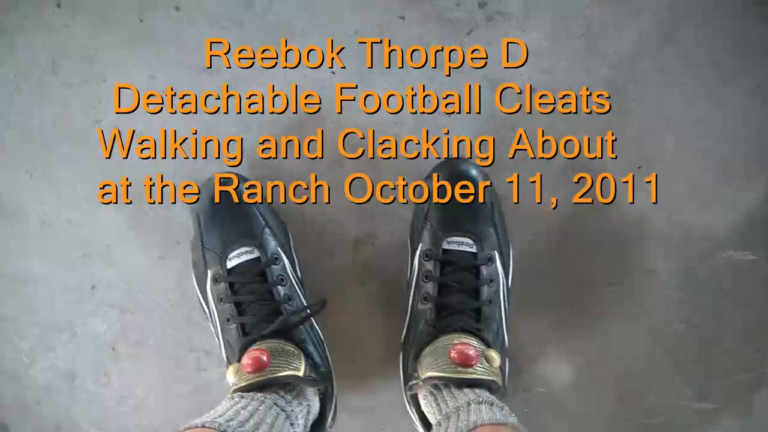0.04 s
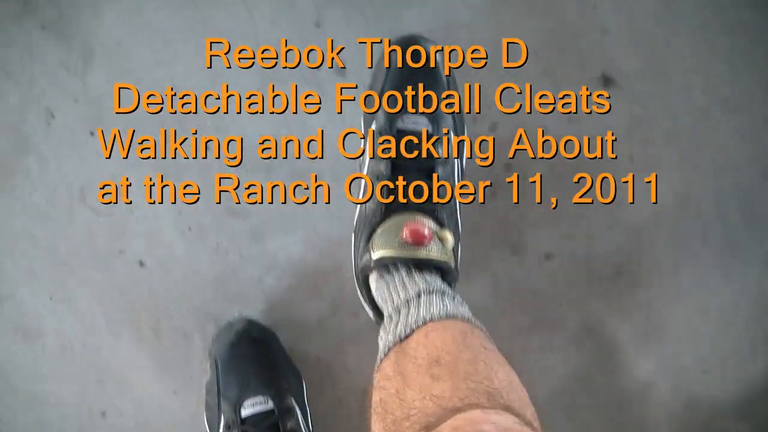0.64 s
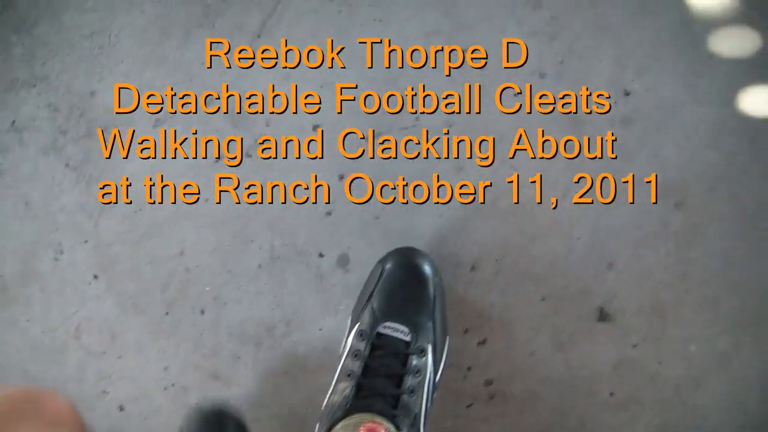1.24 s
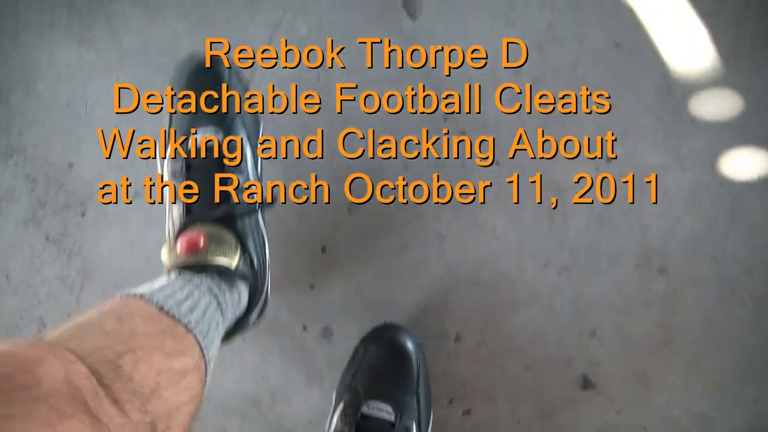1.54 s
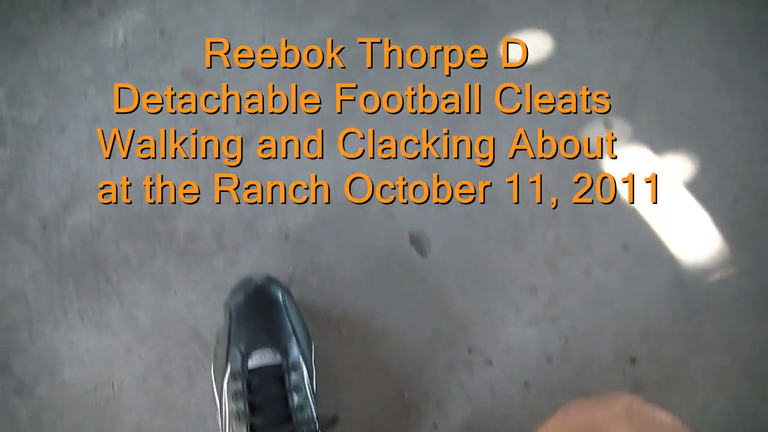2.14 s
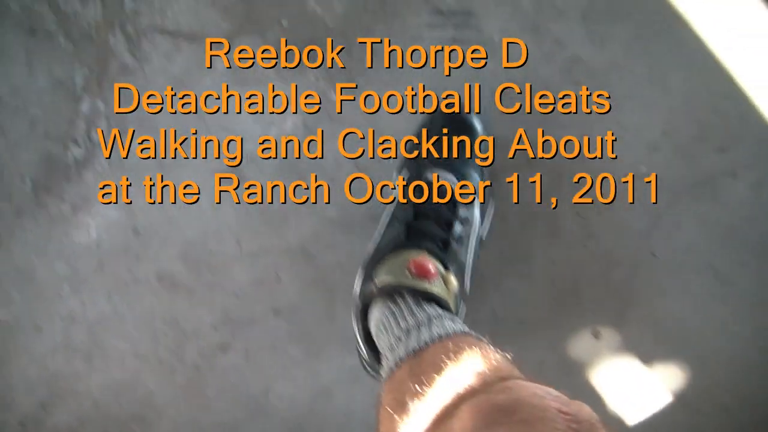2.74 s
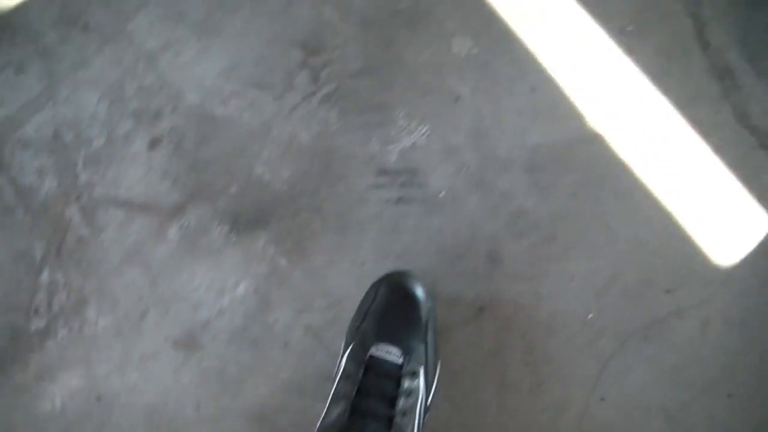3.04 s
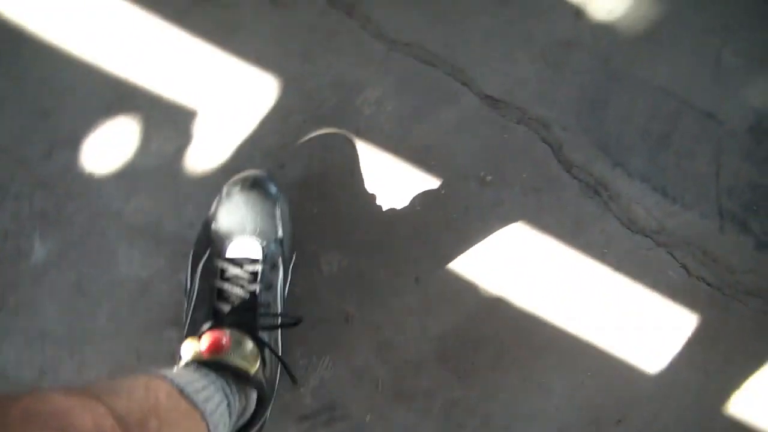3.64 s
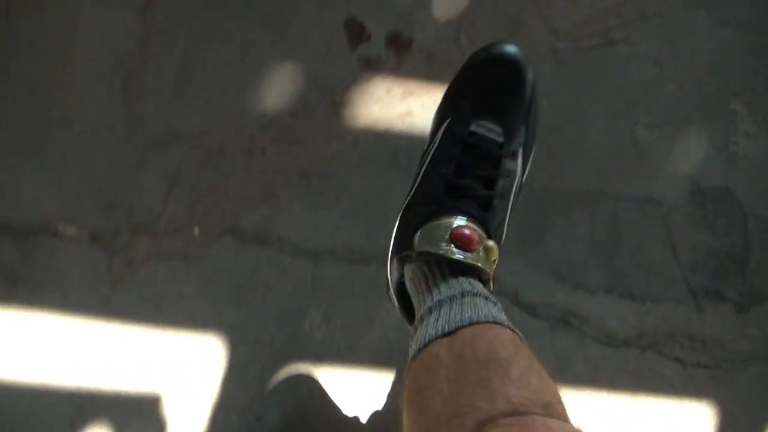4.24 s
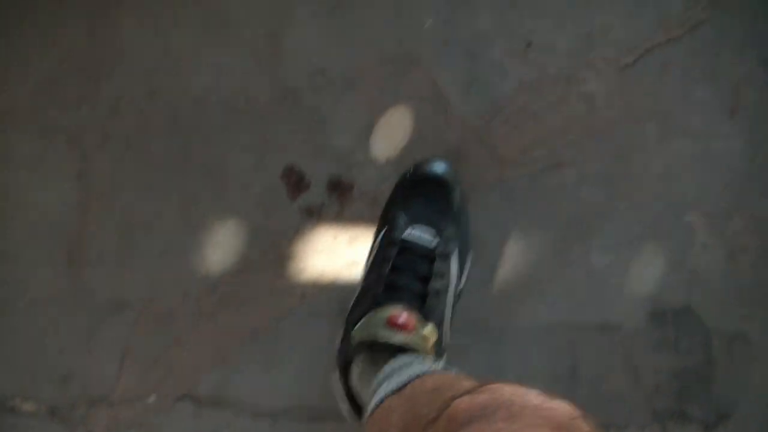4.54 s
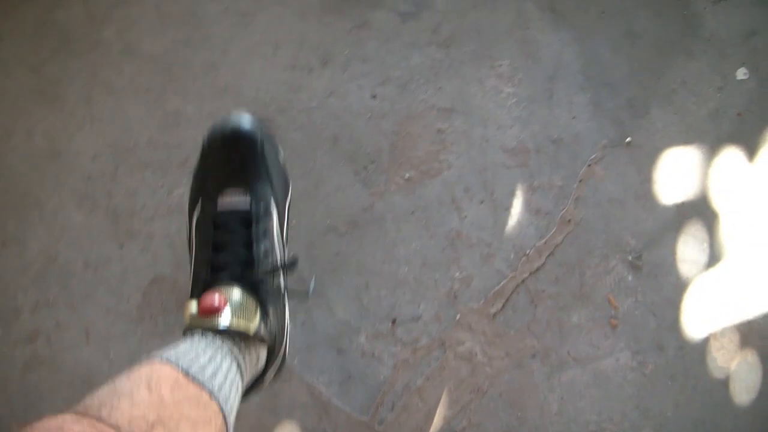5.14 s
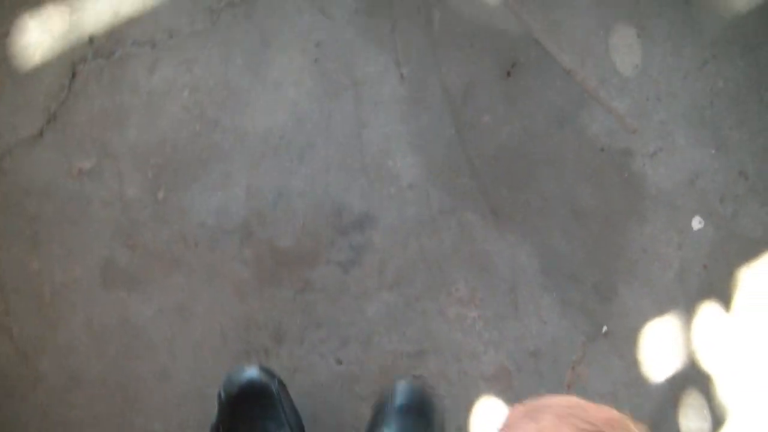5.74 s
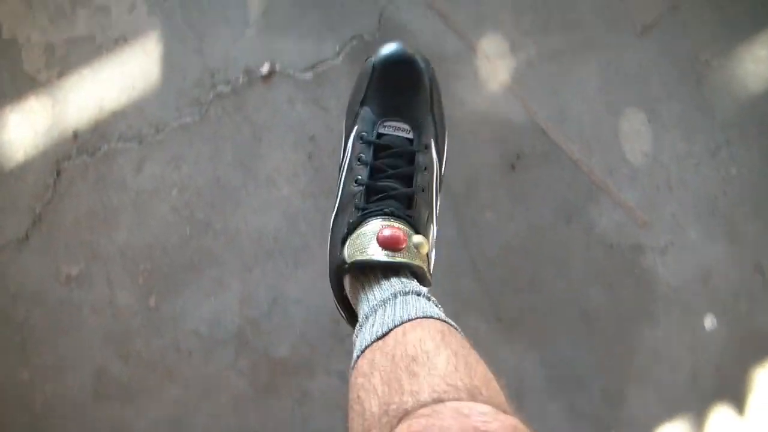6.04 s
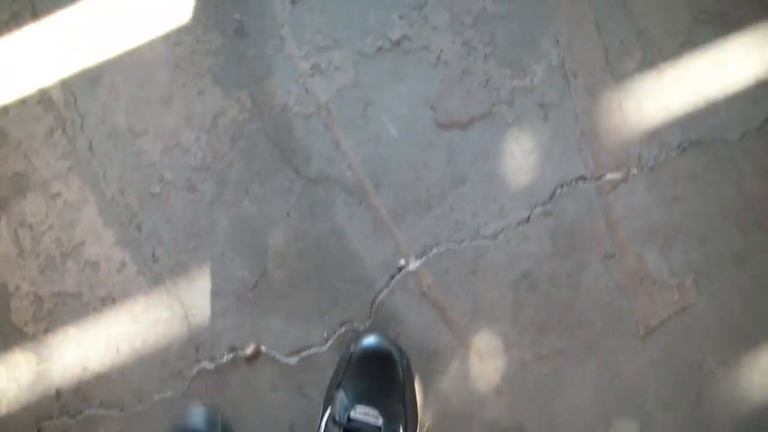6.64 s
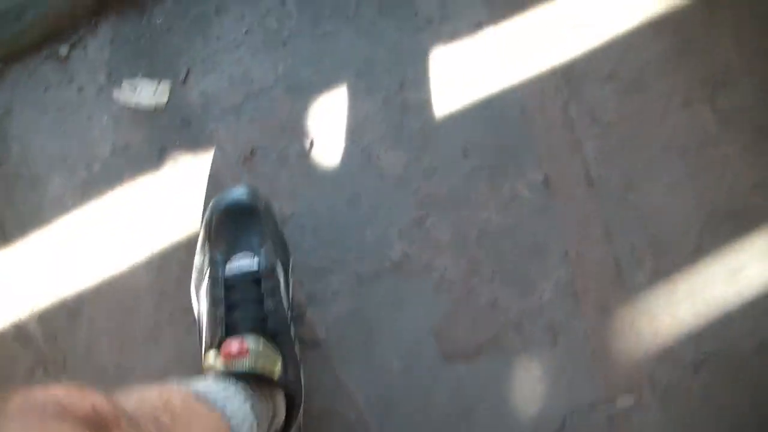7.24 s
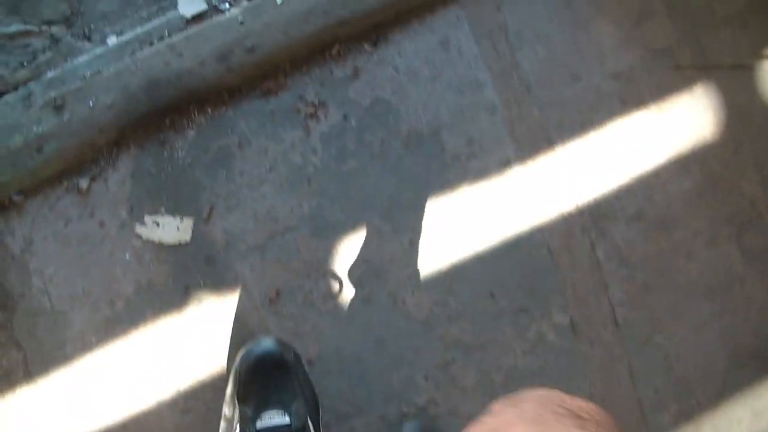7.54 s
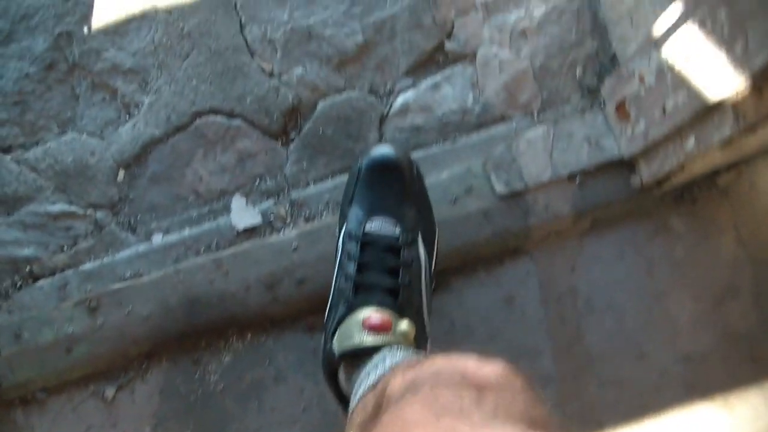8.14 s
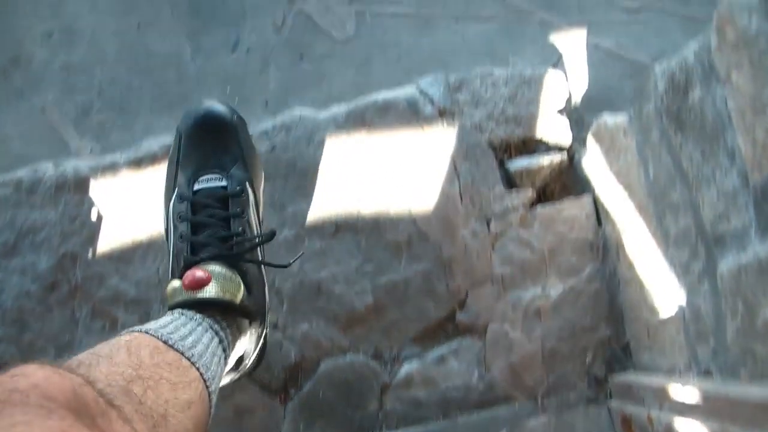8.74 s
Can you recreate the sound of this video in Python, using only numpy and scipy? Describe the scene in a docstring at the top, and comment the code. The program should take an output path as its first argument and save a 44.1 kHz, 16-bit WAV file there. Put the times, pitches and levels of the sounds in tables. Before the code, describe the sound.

Someone in football cleats walks steadily across a concrete floor, just below the microphone. Each step is a heel knock followed by a quick run of hard clacks from sole and studs, ringing briefly in a bare hall. Between steps the shoes creak faintly and a little grit crunches. Moving air bumps the microphone, more toward the end, over a quiet hiss.

```python
'''Football cleats in a bare hall

Someone walks over a concrete floor, just below the microphone. Each step is a heel knock and a quick
run of clacks from sole, plate and studs; they ring on in the hall, and the hardest ones overload.
Between steps the shoes creak as they bend, grit crunches and a swinging leg brushes by once.
Moving air bumps the microphone over a quiet hiss.'''
import sys
import numpy as np
from scipy import signal
from scipy.fft import rfft, irfft
from scipy.io import wavfile

SR = 44100
rng = np.random.default_rng(int(sys.argv[2]) if len(sys.argv) > 2 else 0)


def dump_mix(stems):
    """Bounce the given channels to the path in sys.argv[1] as a 16-bit WAV at rate SR."""
    frames = np.atleast_2d(stems).T  # one column per channel
    limited = np.clip(frames, -1, 1)  # hard clip at full scale
    pcm = np.round(limited * 32767).astype(np.int16)
    wavfile.write(sys.argv[1], SR, pcm)


N = 392049
TIME = np.arange(N) / SR

# The walk. Each row: heel landing in seconds, heel level in dB, seconds until the second heel stud,
# echo level in dB, echo brightness in dB.
STEPS = [(0.75, -1.5, .022, -4, 5.5), (1.7492, -6.5, 0.025, 0.5, -2), (2.6603, -2, 0.046, 0, -3.5),
         (3.6072, 2, 0.017, 0.5, 3.5), (4.4293, 1, 0.043, -4, 2.5), (5.3602, -4.5, .013, 0, 3),
         (6.2035, 3, .0334, -4, 1.5), (7.1614, 5.5, .012, -2.5, 0.5), (8.0709, 2.5, .023, -5.5, 5.5)]


def from_db(db):
    """Decibels to gain."""
    return 10 ** (np.asarray(db) / 20)


def rms_one(x):
    """Scale to unit rms."""
    return x / np.sqrt(np.mean(x ** 2) + 1e-20)


def at_hz(points, hz):
    """Read a curve on a log-frequency axis."""
    freqs, values = np.transpose(points)
    return np.interp(np.log(np.maximum(hz, 1)), np.log(freqs), values)


def fader(points, t):
    """Gain that follows a curve of (seconds, dB) points."""
    return from_db(np.interp(t, *np.transpose(points)))


def add(out, start_s, sound):
    """Mix a sound in at its start time."""
    first = max(round(start_s * SR), 0)
    part = out[..., first:first + sound.shape[-1]]
    part += sound[..., :part.shape[-1]]


def coloured(x, curve):
    """Equalise with a curve of (Hz, dB) points."""
    size = x.shape[-1]
    return irfft(rfft(x) * from_db(at_hz(curve, np.fft.rfftfreq(size, 1 / SR))), size)


def softened(x, corner_hz):
    """A contact lasts a moment, so it drives little above its corner frequency."""
    return signal.sosfilt(signal.butter(4, corner_hz, fs=SR, output="sos"), x)


def ring(modes, pitch=1, size=900):
    """Heavily damped modes that swell for one time constant and die within a few cycles."""
    t = TIME[:size]
    return sum(from_db(db) * t / tau * np.exp(1 - t / tau) * np.sin(2 * np.pi * hz * pitch * t)
               for hz, tau, db in modes)


def diffuse(size):
    """White noise from all around: alike at both microphone ports in the bass, wide in the treble."""
    # Stereo likeness. Each row: frequency in Hz, left-right correlation.
    likeness = [(60, 0.71), (290, 0.95), (640, 0.87), (1410, 0.32), (3100, 0.056), (7000, 0.11)]
    alike = at_hz(likeness, np.fft.rfftfreq(size, 1 / SR))
    mid, side = rfft(rng.standard_normal((2, size)))
    return irfft(np.sqrt((1 + alike) / 2) * mid + np.sqrt((1 - alike) / 2) * side * [[1], [-1]], size)


def room_tone(hiss_db=-47.5):
    """The quiet air of the hall and microphone hiss, with two faint, high whines."""
    # Tone of the hiss. Each row: frequency in Hz, relative level in dB.
    hiss_colour = [(80, -28), (150, -6.5), (450, 0.5), (680, -4), (1000, -1), (1900, -6), (3300, -8.5),
                   (3830, -4.5), (4650, -12), (15500, -16)]
    # Steady tones. Each row: frequency in Hz, rms level in dB.
    whines = [(10309, -83), (15256, -79)]
    tones = sum(from_db(db) * np.sqrt(2) * np.sin(2 * np.pi * hz * TIME) for hz, db in whines)
    return from_db(hiss_db) * rms_one(coloured(diffuse(N), hiss_colour)) + tones


def wind(left_db=6.0, right_db=-1.0, eddy_db=15, puff_right_db=-14):
    """Moving air rumbles separately at each port; a few puffs bump mainly the left one."""
    # Swells of air as the legs swing. Each row: time in seconds, relative level in dB.
    swells = [(0.17, -51), (0.57, -26.5), (1.07, -32.5), (1.48, -47.5), (1.88, -45.5), (2.38, -46),
              (3.08, -34), (3.27, -48.5), (3.73, -32), (4.08, -51), (4.58, -36), (5.38, -30.5), (5.67, -40),
              (6.47, -28), (6.92, -37.6), (7.17, -27.5), (8.18, -22.5), (8.82, -28)]
    # Tone of the rumble. Each row: frequency in Hz, relative level in dB.
    rumble_colour = [(10, -1.5), (22, 1), (45, -8), (80, -14.5), (140, -33), (400, -62.5)]
    # Single puffs. Each row: start in seconds, level in dB, frequency in Hz.
    puff_cues = [(7.813, -7, 36), (8, -3, 61), (8.346, 0, 35), (8.716, -11, 74), (8.843, -5, 142)]
    lumps_db = np.interp(TIME, np.linspace(0, TIME[-1], 110), rng.uniform(-6, 4, 110))   # 12 a second
    gust = fader(swells, TIME) * from_db(lumps_db)
    octave_up = [(2 * hz, db) for hz, db in rumble_colour]
    deep = rms_one(coloured(rng.standard_normal((2, N)), rumble_colour))
    eddies = rms_one(coloured(rng.standard_normal((2, N)), octave_up))
    rumble = gust * deep + from_db(eddy_db) * gust ** 2 * eddies   # strong gusts add smaller eddies
    puffs = np.zeros(N)
    for start, db, hz in puff_cues:
        add(puffs, start, -ring([(hz, 1 / (np.pi * hz), db)], size=6000))
    return rumble * from_db([[left_db], [right_db]]) + puffs * from_db([[0], [puff_right_db]])


def hall_response(size=SR, tail_db=-30.5):
    """The hall's answer from one spot: strong early echoes, then a tail whose very top dies first."""
    # Shape of the early echoes. Each row: seconds after a contact, relative level in dB.
    onset = [(0, 7.5), (.009, -4.5), (.013, -1), (.05, -2.5)]
    # Reverb time. Each row: band centre in Hz, seconds to fall by 60 dB.
    decays = [(200, 0.75), (800, 0.69), (2000, 0.73), (5000, 0.79), (12000, 0.067)]
    # Tone of the hall. Each row: frequency in Hz, gain in dB.
    hall_colour = [(100, -12.5), (180, 0), (300, 1), (440, 5.5), (600, 0.5), (950, -1.5), (1600, -2),
                   (3000, -6), (6000, 3), (14000, -3)]
    t, hz = TIME[:size], np.fft.rfftfreq(size, 1 / SR)
    spectrum = rfft(diffuse(size) * fader(onset, t))
    centres, t60s = np.transpose(decays)
    tail = 0
    for share, t60 in zip(np.eye(len(t60s)), t60s):
        band = irfft(spectrum * np.interp(hz, centres, share), size)
        tail = tail + band * from_db(-60 * t / t60)
    return from_db(tail_db) * coloured(tail, hall_colour)


def hall_echoes(feet, dull_hz=1000, bright_hz=2800):
    """Every step falls at a new spot and so has echoes of its own."""
    out = np.zeros((2, N))
    edges = [0] + [round(step[0] * SR) for step in STEPS[1:]] + [N]
    for (*_, db, bright_db), first, last in zip(STEPS, edges, edges[1:]):
        shelf = [(dull_hz, db), (bright_hz, db + bright_db)]
        # keep the first 0.9 s of the hall's ring so it dies away without a late click
        response = coloured(hall_response(), shelf)[:, :-SR // 10]
        add(out, first / SR, signal.fftconvolve(feet[None, first:last], response, axes=1))
    return out


def leg_brush(peak_s=1.44, peak_db=-39.5, rise_s=0.032, fall_s=0.022):
    """One light brush of the swinging leg: a soft hiss that swells and fades."""
    # Tone of the brush. Each row: frequency in Hz, relative level in dB.
    brush_colour = [(1500, -26), (3500, 1), (6000, -2.5), (10000, 3.5), (15000, -7)]
    width = np.where(TIME < peak_s, rise_s, fall_s)
    swell = np.exp(-np.minimum(((TIME - peak_s) / width) ** 2, 20))
    return from_db(peak_db) * swell * rms_one(coloured(rng.standard_normal(N), brush_colour))


def grit(grain_db=-0.5, size=2500):
    """Grit crunches under a stud or the shoe ticks: short grainy bursts, each in its own band."""
    # Each row: start in seconds, length in seconds, rms level in dB, low and high band edge in Hz.
    bursts = [(0.958, 0.0058, -35, 11200, 15600), (0.9674, 0.002, -24.5, 5600, 16000),
              (0.962, 0.01, -29.5, 700, 2200), (1.076, 0.021, -26.5, 950, 2420),
              (1.092, 0.0083, -30, 5000, 15500), (1.104, 0.0011, -11, 1880, 4400),
              (4.697, 0.0089, -40, 3840, 5170), (4.721, 0.013, -43.5, 4240, 5860),
              (5.028, 0.0026, -40.5, 900, 3380), (6.762, 0.0047, -29.5, 1820, 3530)]
    out = np.zeros(N)
    for start, length, db, low, high in bursts:
        swell = np.sin(np.pi * np.minimum(TIME[:size] / length, 1))
        grains = rng.standard_normal(size) * from_db(grain_db * rng.standard_normal(size)) * swell
        crunch = signal.sosfilt(signal.butter(2, [low, high], "band", fs=SR, output="sos"), grains)
        crunch_rms = np.sqrt(np.sum(crunch ** 2) / (length * SR))
        add(out, start, from_db(db) * crunch / crunch_rms)
    return out


def creaks(uneven_db=3.5, leather_hz=2800, jitter=0.15, ease_db_per_s=-8, max_slips=60):
    """The trailing shoe bends: its upper sticks and slips in a run of ticks, easing as the foot lifts."""
    # Each row: start in seconds, slips per second, opening level in dB.
    bends = [(0.464, 32, -30), (2.436, 82, -29.5), (4.047, 76, -31), (5.85, 87, -30.5), (6.878, 31, -34),
             (7.621, 57, -30)]
    # Modes of the shoe upper. Each row: frequency in Hz, time constant in seconds, level in dB.
    upper = [(1140, 0.00013, 3.5), (1920, 0.00037, -8.5), (3090, 0.00017, 0)]
    out = np.zeros(N)
    for start, slips_per_s, db in bends:
        next_heel = min(step[0] for step in STEPS if step[0] > start)
        gap, strength, detune = rng.standard_normal((max_slips, 3)).T
        slip_s = start + np.r_[0, np.cumsum(np.exp(jitter * gap[1:]))] / slips_per_s
        slip_db = db + ease_db_per_s * (slip_s - start) + uneven_db * strength
        for k in np.flatnonzero(slip_s < next_heel - .025):   # stop just before the heel lands
            add(out, slip_s[k], from_db(slip_db[k]) * ring(upper, 1 + .05 * detune[k]))
    return softened(out, leather_hz)


def contacts(heel_pitch=0.92, heel_spread=0.1):
    """Every blow on the floor: its start in seconds, (sole, plate, stud) mix in dB and pitch factor."""
    # Three kinds of blow follow the heel. Each row: start in seconds, level in dB, pitch factor.
    clacks = [(0.1965, -7.5, 0.83), (1.9463, -4, 1.09), (2.789, 3.5, 1.1), (3.712, 2.5, 1.18),
              (4.525, 6.5, 1.06), (4.5757, -3.5, 1.27), (5.3085, -24, 0.89), (5.4241, 5, 1.14),
              (6.3047, 3, 1.13), (6.3139, -1, 1.07), (8.085, 7, 1.28), (8.1035, -3.5, 1.24),
              (8.167, -1.5, 0.98), (8.5725, -23.5, 0.92)]   # the forefoot slaps down and the sole plate rings hollow
    stamps = [(0.8577, 3.5, 0.4), (1.0858, -9, 0.88), (1.1037, 5, 1.07), (1.8695, 3, 0.53),
              (1.8732, -8, 0.58), (2.8132, 0.5, 0.69), (3.6692, 4.5, 0.72), (3.6798, -5, 0.99),
              (5.4326, -2, 1.34), (5.4416, -1.5, 0.75), (5.4475, -7.5, 1.03), (6.3554, 2, 0.46),
              (7.228, -2, 0.51), (7.2362, 5, 1.156)]   # a front stud hits squarely with a hard crack
    thuds = [(1.0792, -16.5, 1.06), (1.8694, -13, 0.6), (2.793, -13.5, 1.1), (3.7163, -9, 1.35),
             (4.5113, -9, 1.37), (4.5757, -4, 1.16), (4.5905, -7, 0.91), (5.4652, -8.5, 1.09),
             (7.2362, 3.5, 1.41), (8.0943, -3, 1.24)]   # the sole comes down flat and dull
    heel_mix, second_stud_mix = (-7.5, -13.5, -7.5), (-12.5, -22.5, -15.5)
    clack_mix, stamp_mix, thud_mix = (-10.5, 0, -20), (-9.5, -3, 0), (0, -7.5, -5.5)
    for start, db, stud_lag, _, _ in STEPS:
        pitch = heel_pitch * np.exp(heel_spread * rng.uniform(-0.89, 1))   # no two heels ring alike
        yield start, np.add(heel_mix, db), pitch
        yield start + stud_lag, np.add(second_stud_mix, db), 1.12 * pitch   # softer, a little higher
    for blows, mix in (clacks, clack_mix), (stamps, stamp_mix), (thuds, thud_mix):
        for start, db, pitch in blows:
            yield start, np.add(mix, db), pitch


def cleats(crack_db=-22.0, crack_s=0.00031, stud_hz=3900, rattle_db=-14.0, rattle_s=0.015):
    """Each contact sets sole, sole plate and stud ringing; two neighbouring studs rattle down after it."""
    # Modes of the shoe. Each row: base frequency in Hz, time constant in seconds, level in dB.
    sole = [(290, 0.00056, -2.5), (597, 0.00088, -1)]   # thump
    plate = [(956, 0.0004, 1), (1350, 0.00033, -20.5)]   # clack
    stud = [(1662, 0.00016, -4), (2590, 0.000096, -1.5)]   # click
    rings, cracks = np.zeros((2, N))
    crack_decay = np.exp(-TIME[:900] / crack_s)
    for start, (sole_db, plate_db, stud_db), pitch in contacts():
        for modes, db, sign in (sole, sole_db, 1), (plate, plate_db, -1), (stud, stud_db, 1):
            add(rings, start, sign * from_db(db) * ring(modes, pitch))
        force = min(from_db(max(sole_db, plate_db, stud_db)), 1)
        crack = rng.standard_normal(crack_decay.size) * crack_decay
        add(cracks, start, from_db(crack_db) * force ** 2 * crack)   # hard blows crush far more grit
        for when, weight, tone in rng.random((2, 3)):
            tap = ring(stud, 1.3 + .5 * tone) - .5 * ring(plate, 1 + .5 * tone)
            add(rings, start + .003 + rattle_s * when, from_db(rattle_db) * force * weight * tap)
    return softened(rings, stud_hz) + cracks


def at_ports(feet, lag_s=3.6e-5):
    """The direct sound reaches the microphone's right port a moment after the left."""
    return np.array([feet, np.interp(TIME - lag_s, TIME, feet)])


def scene(rustle_send_db=-3.5):
    """Feet just below the microphone, the hall around them, air on the ports."""
    steps = cleats()
    rustles = grit() + creaks() + leg_brush()
    echoes = hall_echoes(steps + from_db(rustle_send_db) * rustles)
    return at_ports(steps + rustles) + echoes + wind() + room_tone()


def record(dry, start_s=0.116, cutoff_hz=15500):
    """The sound opens after a moment of silence; the loudest clacks clip flat and the top is cut."""
    fade_in = np.clip((TIME - start_s) / .004, 0, 1)
    clipped = np.clip(dry * fade_in, -1, 1)
    return signal.sosfilt(signal.ellip(10, .1, 70, cutoff_hz, fs=SR, output="sos"), clipped)


dry = scene()
out = record(dry)
dump_mix(out)
```